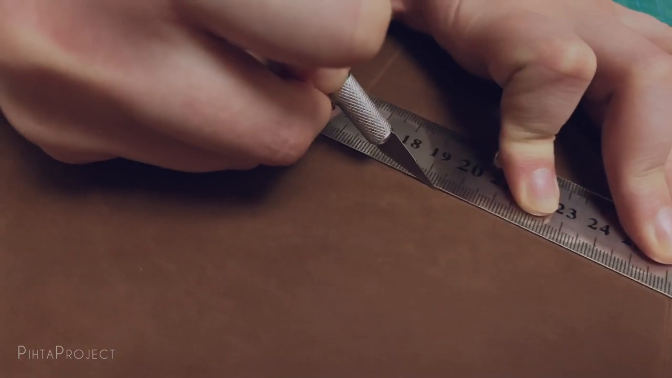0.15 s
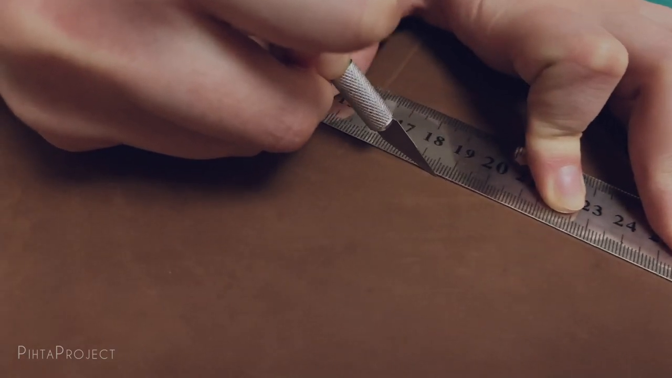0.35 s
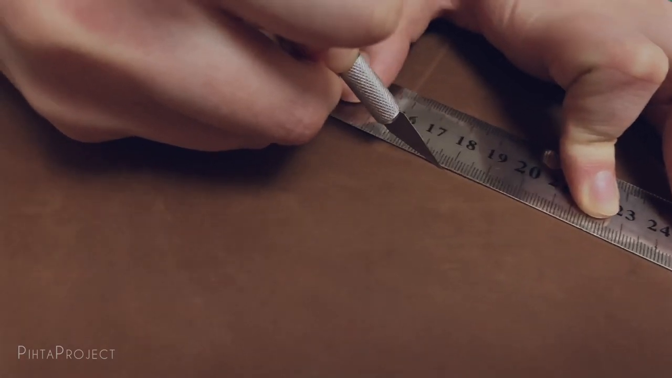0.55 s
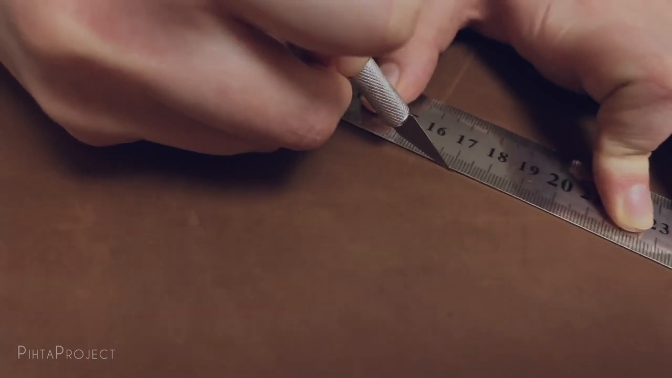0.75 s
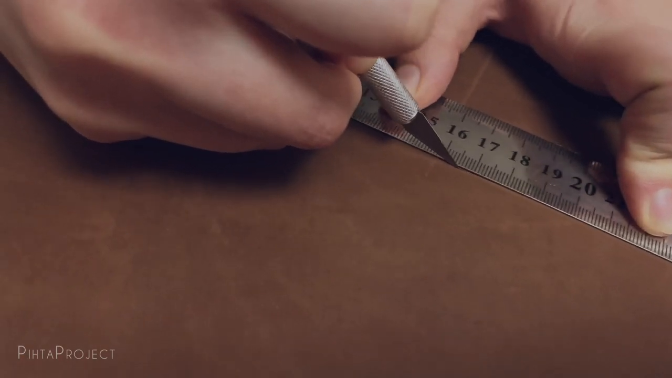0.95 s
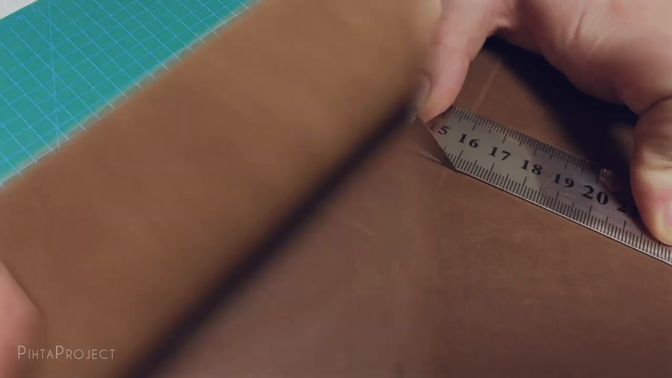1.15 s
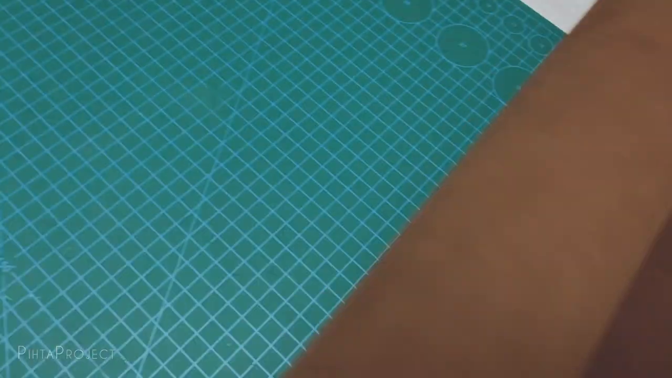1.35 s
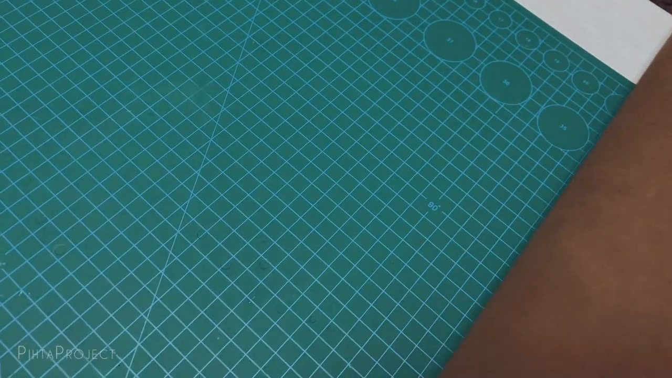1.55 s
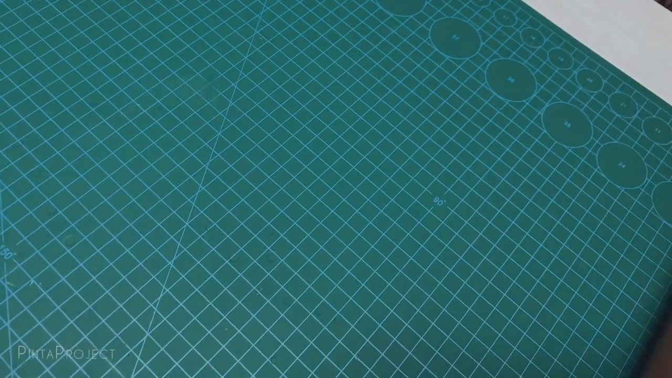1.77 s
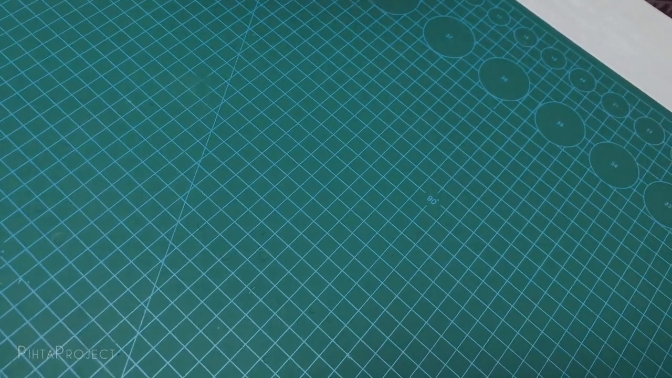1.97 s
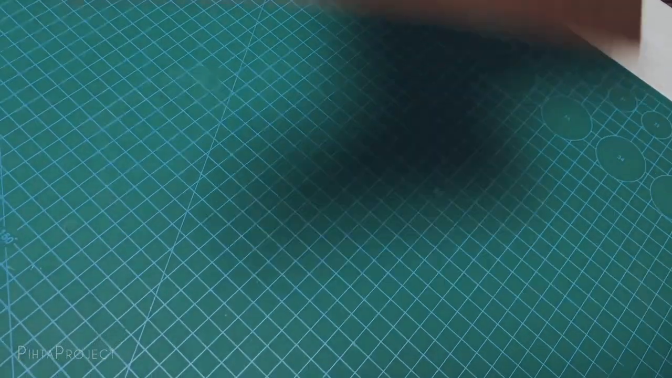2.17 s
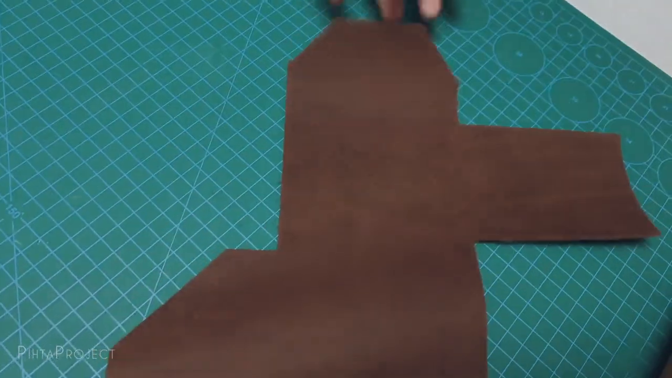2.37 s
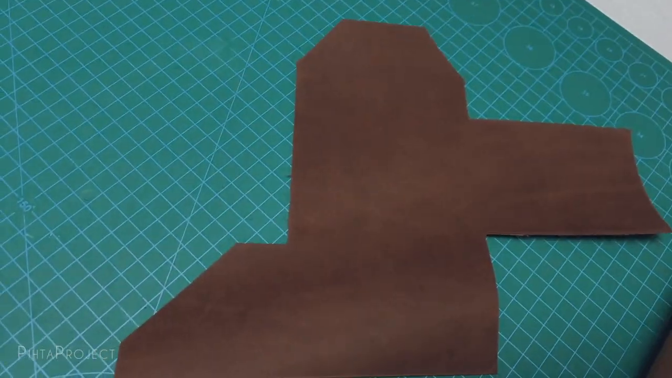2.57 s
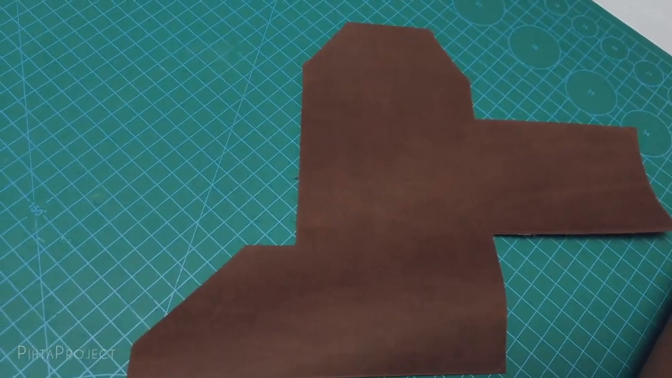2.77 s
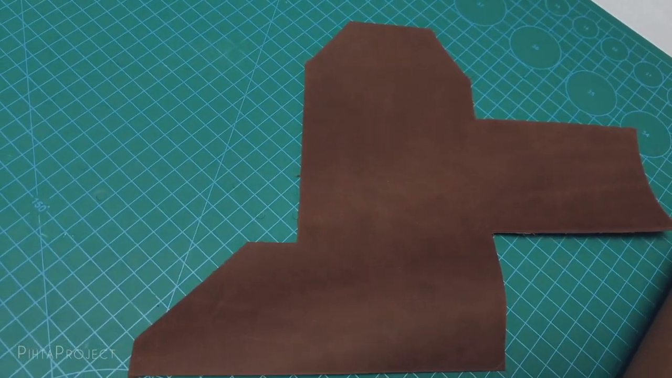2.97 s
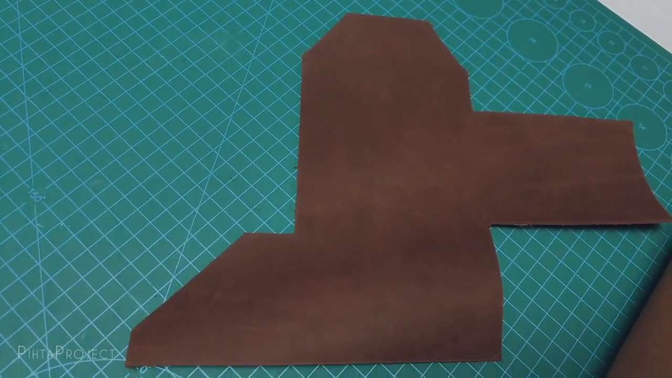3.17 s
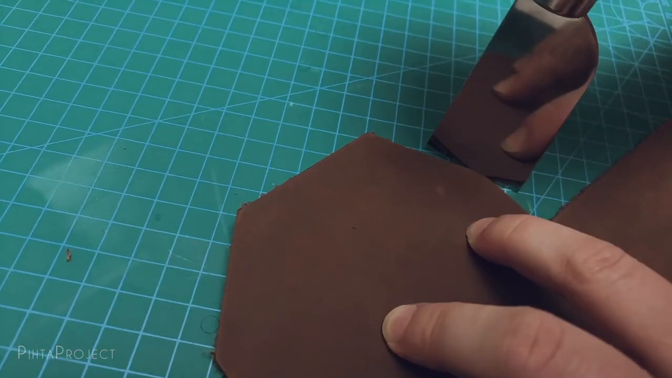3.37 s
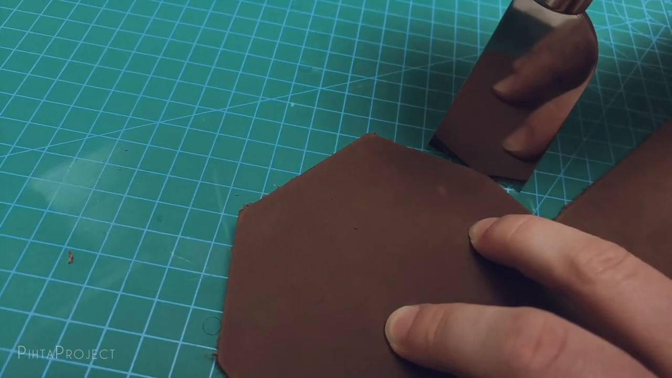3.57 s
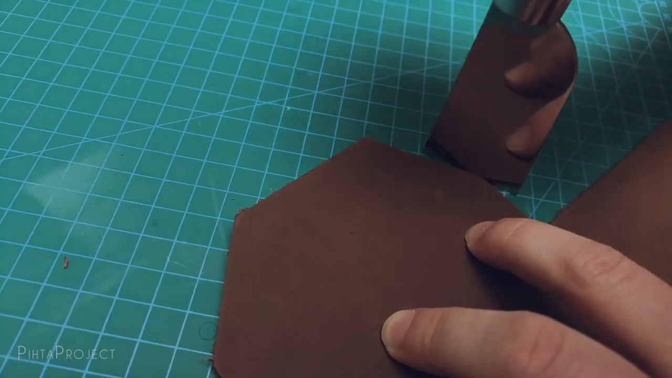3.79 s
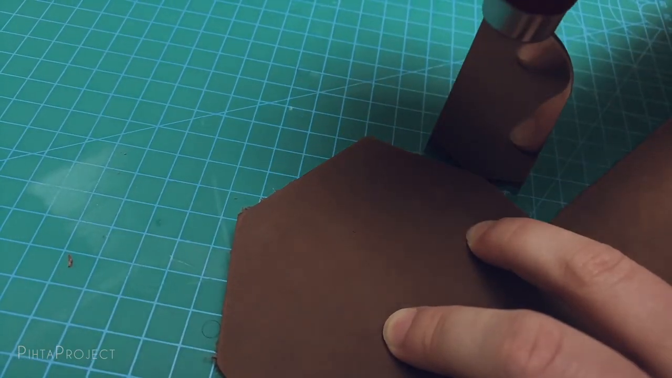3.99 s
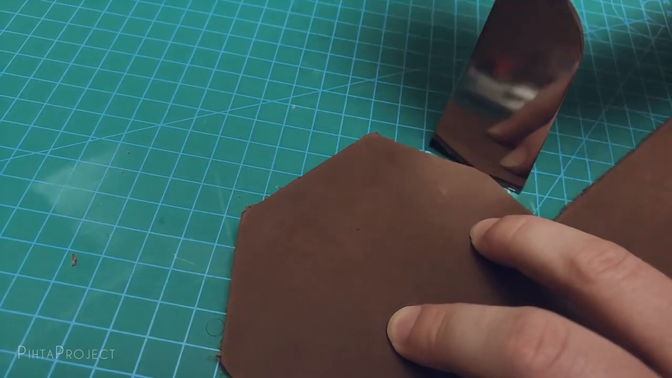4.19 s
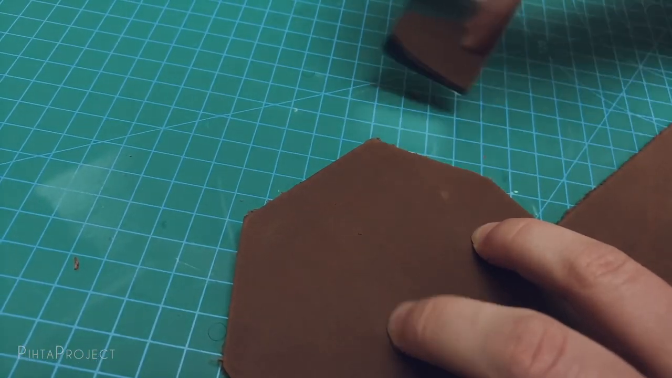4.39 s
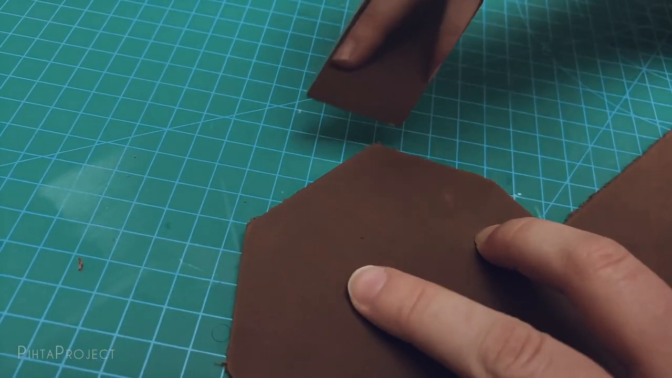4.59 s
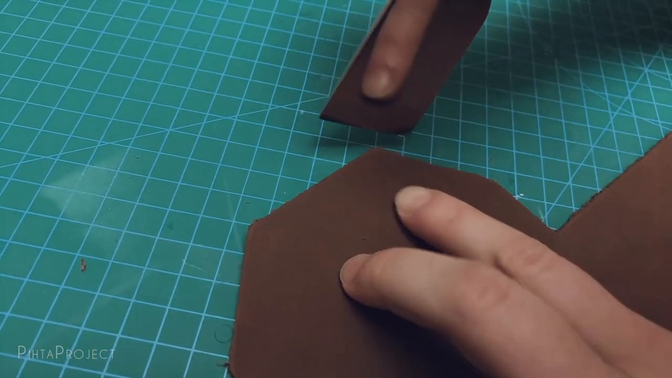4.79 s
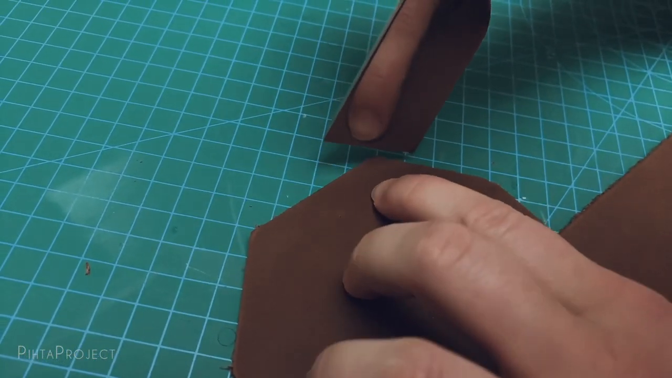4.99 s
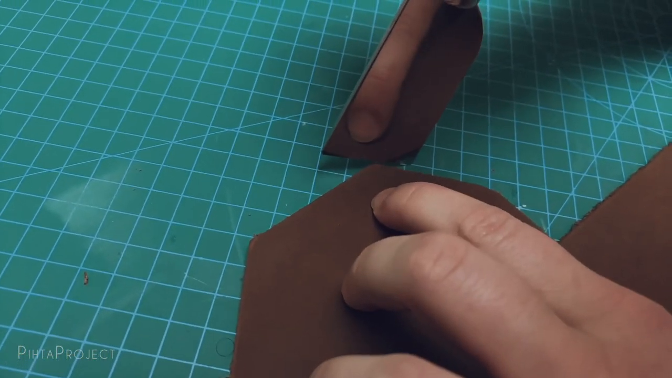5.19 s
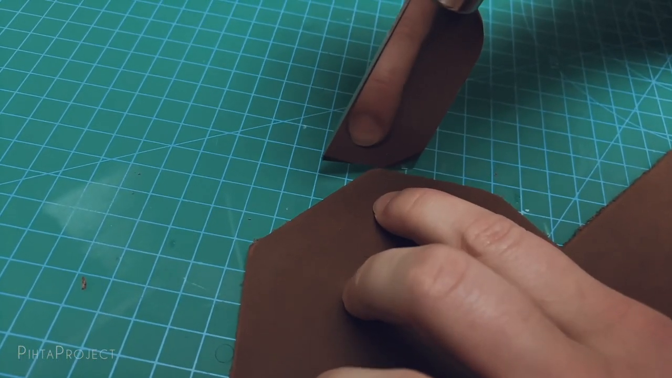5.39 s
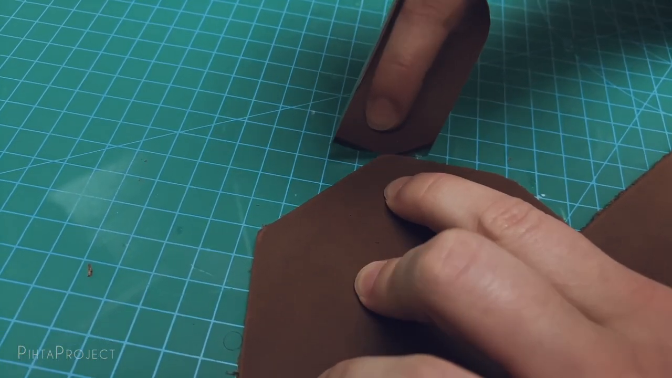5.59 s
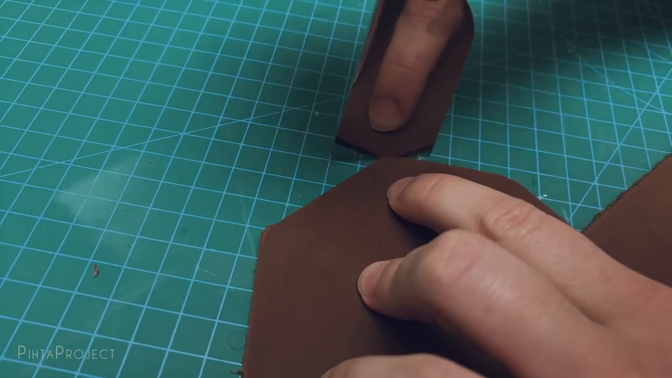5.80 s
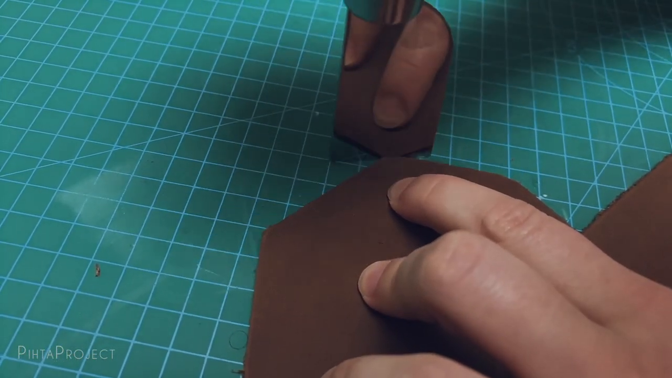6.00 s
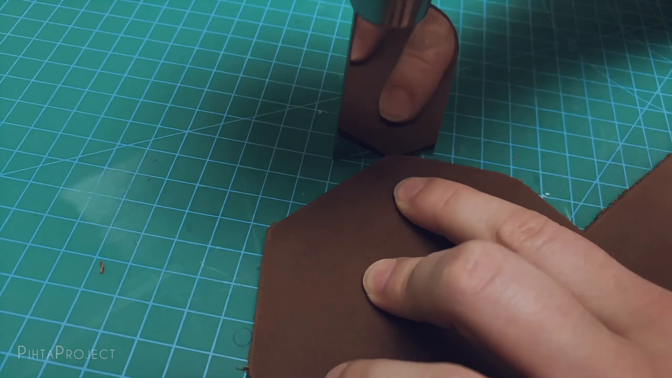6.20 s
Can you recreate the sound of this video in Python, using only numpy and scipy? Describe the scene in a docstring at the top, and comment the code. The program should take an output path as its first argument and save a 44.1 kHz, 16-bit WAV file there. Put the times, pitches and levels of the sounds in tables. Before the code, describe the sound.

Close leatherwork in a quiet small room: one long gritty knife cut, snappy leather slaps, a tiny squeak, then three short chopping crunches among soft slides.

```python
"""Leatherwork at a desk in a small room, close to the microphone, over steady room air.
A hobby knife rasps along a steel ruler: random fibre clicks through leather, ruler and desk spectra.
A hide is flipped over and a cut piece slapped onto the mat (pulses of air, snaps, rustle); the dragged hide
squeaks twice (noise on a rising tone). A broad knife chops off three corners (clicks through knife modes)
while fingers slide and turn the work (swept-speed grain). The level drops twice, briefly, before the chops."""
import sys
import numpy as np
from scipy import signal
from scipy.io import wavfile
from scipy.ndimage import uniform_filter1d

SR = 44100
rng = np.random.default_rng(int(sys.argv[2]) if len(sys.argv) > 2 else 0)


def wav_record(signal):
    """Record a signal, one row per channel, as 16-bit PCM in the file named by sys.argv[1]."""
    frames = np.transpose(np.atleast_2d(signal))
    bounded = np.clip(frames, -1, 1)
    # unit amplitude maps onto the largest positive 16-bit level
    quanta = np.round(bounded * 32767).astype(np.int16)
    wavfile.write(sys.argv[1], SR, quanta)


N = 275625
TIME = np.arange(N) / SR
HZ = np.fft.rfftfreq(4096, 1 / SR)


def amp(db):
    """Decibels to gain."""
    return 10 ** (np.asarray(db) / 20)


def unit(x):
    """Scales to rms 1."""
    return x / np.sqrt(np.mean(x ** 2) + 1e-20)


def read(points, hz=HZ):
    """Interpolates a table along a log-frequency axis."""
    f, value = np.transpose(points)
    return np.interp(np.log(hz + 1), np.log(f + 1), value)


def add(mix, start_s, sound):
    """Mixes a sound in, in place, cut off at the end of the mix."""
    part = mix[round(start_s * SR):][:len(sound)]
    part += sound[:len(part)]


def response(db):
    """Minimum-phase impulse response with the given spectral shape, scaled to energy 1."""
    log_gain = np.log(amp(np.r_[db, db[-2:0:-1]]))
    spectrum = np.exp(np.conj(signal.hilbert(log_gain)))
    taps = np.fft.ifft(spectrum).real
    return taps / np.linalg.norm(taps)


def colour(x, db):
    """Passes x through a body with the given spectral shape."""
    return signal.oaconvolve(x, response(db))[:len(x)]


def fibres(per_s, spread_db):
    """Fibres parting one by one: clicks of random time, sign and size, rms 1."""
    size = amp(spread_db * np.minimum(rng.exponential(1, N), 3))
    sign = rng.choice([-1, 1], N)
    parts_now = rng.random(N) < per_s / SR
    return unit(size * sign * parts_now)


def judder(rate_hz, depth_db):
    """Uneven sticking and slipping, as a gain of mean power 1."""
    knots = rng.standard_normal(N)
    return unit(amp(depth_db * np.interp(TIME * rate_hz, np.arange(N), knots)))


# room air spectrum: f/Hz, relative level/dB
AIR_SPECTRUM = [(20, -18.5), (36, -0.5), (48, -6), (61, 3.5), (80, -11), (105, -14.5), (135, -7.5),
                (170, -9), (215, -5.5), (280, -13), (340, -9.5), (700, -19), (1200, -21.5), (1700, -26),
                (10900, -40.5), (15500, -48)]
AIR_DB = -56


def hush():
    """Steady air of the room: shaped white noise."""
    return amp(AIR_DB) * colour(rng.standard_normal(N), read(AIR_SPECTRUM))


def steel_rule(x, t60_s, ring_db):
    """The thin ruler has many close modes: each snap rings on briefly with a fixed, jagged colour."""
    t = TIME[:SR // 20]
    ring = rng.standard_normal(len(t)) * amp(-60 * t / t60_s)
    return x + amp(ring_db) * signal.oaconvolve(x, ring / np.linalg.norm(ring))[:N]


# long cut: t/s, fibre rasp level/dB, ruler fizz level/dB, both before the gains below
STROKE = [(0.02, -48.5, -64.5), (0.294, -47, -67), (0.38, -44, -60), (0.5, -49, -61), (0.51, -52, -65),
          (0.634, -46, -57.5), (0.9, -52, -70.5), (0.926, -53, -70), (1.17, -52.5, -65.5)]
# toughest fibres catching the blade: t/s, click size/dB over the rms of the others
SNAGS = [(0.132, 31), (.171, 23), (.23, 23), (0.728, 30), (.756, 20), (.834, 23)]
# rasp spectrum, arm stretched out: f/Hz, relative level/dB
RASP_FAR = [(180, -24), (300, -18), (381, -4), (465, -9.5), (583, -0.5), (721, -10.5), (797, -6), (987, -7),
            (1120, -15), (1280, 0.5), (1590, -9), (2200, 0.5), (2530, -15), (2790, -11), (6000, -38),
            (7800, -44), (13200, -120)]
# rasp spectrum, knife drawn near: f/Hz, relative level/dB
RASP_NEAR = [(180, -15), (300, -15), (442, -2), (471, -11.5), (613, 3), (749, -9.5), (808, -4.5),
             (1120, -7.5), (1270, -5.5), (1670, -8), (1870, -2), (2070, -10), (2760, -5), (3130, -12),
             (6000, -41.5), (7800, -78), (13200, -120)]
# spectrum of the blade on the ruler: f/Hz, relative level/dB
FIZZ = [(2500, -25.5), (4000, 3.5), (4350, -11), (4770, 2), (5250, -2.5), (6600, -7.5), (7400, -12),
        (8600, -7), (9200, -7.5), (10000, -1.5), (10900, -20), (12800, -28), (15500, -17)]
# spectrum of the desk under the cut: f/Hz, relative level/dB
RUMBLE = [(30, -12.5), (80, 2), (135, 2.5), (190, -7), (260, -1.5), (450, -26), (900, -43.5)]
RASP_GAIN_DB, FIZZ_GAIN_DB, RUMBLE_GAIN_DB = 0, -1.5, -5.5


def long_cut():
    """The blade tears fibres in fits; the same snaps rasp in the leather and fizz on the ruler."""
    t, rasp_db, fizz_db = np.transpose(STROKE)
    drag = np.interp(TIME, [1.16, 1.2], [1, 0]) * judder(rate_hz=29.7, depth_db=0.7)
    rasp = amp(np.interp(TIME, t, rasp_db)) * drag
    fizz = amp(np.interp(TIME, t, fizz_db)) * drag

    snaps = fibres(per_s=3500, spread_db=2.0) * judder(rate_hz=300, depth_db=3.0)
    for at_s, size_db in SNAGS:
        add(snaps, at_s, amp([size_db]))

    near = np.interp(TIME, [.43, .59], [0, 1])
    leather = np.sqrt(1 - near) * colour(snaps, read(RASP_FAR))
    leather += np.sqrt(near) * colour(snaps, read(RASP_NEAR))
    ruler = colour(steel_rule(snaps, t60_s=0.015, ring_db=-5.0), read(FIZZ))
    # separate clicks, but in step with the rasp level
    desk = colour(fibres(per_s=3200, spread_db=-1.0), read(RUMBLE))
    cut = rasp * (amp(RASP_GAIN_DB) * leather + amp(RUMBLE_GAIN_DB) * desk)
    return cut + amp(FIZZ_GAIN_DB) * fizz * ruler


# colour of rubbed leather: f/Hz, relative level/dB
NAP = [(300, 4), (1700, 2.5), (2600, 1), (4500, -2), (9000, -0.5), (15500, -3)]


def rub(grain, start_s, length_s, hz, rise, q, power):
    """Leather grain brushing the mat: a band of clicks swelling and fading with the speed of the move."""
    part = grain[round(start_s * SR):round((start_s + length_s) * SR)]
    speed = np.interp(TIME[:len(part)] / length_s, [0, rise, 1], [0, 1, 0])
    band = 1 / (1 + (q * ((HZ + 1) / hz - hz / (HZ + 1))) ** 2)
    return speed ** power * colour(part, 20 * np.log10(band + 1e-4) + read(NAP))


# leather, blade and fingers sliding: start t/s, length/s, relative level/dB, centre f/Hz
SLIDES = [ (1.191, 0.086, -50, 6200), (1.192, .06, -41, 730), (1.249, 0.21, -49, 880),
          (1.378, 0.072, -44, 250), (1.61, 0.16, -47, 1490), (1.761, .17, -51, 1600),
          (2.14, 0.24, -63.5, 1510), (2.35, .12, -51, 990), (3.626, .04, -52, 1410),
          (3.752, 0.27, -57, 1510), (4.391, 0.069, -49.5, 2850), (4.44, 0.29, -61, 1880),
          (4.662, 0.043, -55.5, 1600), (4.68, 0.28, -55, 2250), (4.789, 0.099, -56, 3700),
          (4.922, 0.21, -60.5, 1392), (5.865, .25, -53, 1400), (5.928, 0.33, -55, 330),
          (6.2, 0.085, -57, 2750)]
SLIDE_RISE = 0.3  # share of the slide spent speeding up
SLIDE_Q, SLIDE_Q_HZ = 0.39, 3800  # broad band, sharper the higher it lies


def slides():
    """The work is pushed and turned on the mat: each move speeds up quickly and runs out slowly."""
    grain = fibres(per_s=7000, spread_db=3.5) * judder(rate_hz=130, depth_db=2.5)
    out = np.zeros(N)
    for start_s, length_s, db, hz in SLIDES:
        q = np.hypot(SLIDE_Q, hz / SLIDE_Q_HZ)
        add(out, start_s, amp(db) * rub(grain, start_s, length_s, hz, SLIDE_RISE, q, power=0.63))
    return out


# desk modes under the mat: f/Hz, relative level/dB, t60/s
DESK = [(41.3, -33, 0.5), (62.5, -16, 0.096), (131, -5, 0.2), (174, -3.5, 0.075), (214, -4, 0.041),
        (253, 0.5, 0.11), (320.6, 2, 0.14), (469.5, 0.5, 0.19), (592, -9, 0.17)]
SETTLE, GLIDE_SWELLS = 0.497, 1.22  # usual final share of the first pitch; time constant of the glide


def thump(first_hz, swell_s, settle, desk_db):
    """Air squeezed out in a pulse whose pitch sinks as the contact spreads, and the desk shaking under it."""
    t = TIME[:SR // 2]
    u = t / swell_s
    hz = first_hz * (settle + (1 - settle) * np.exp(-u / GLIDE_SWELLS))
    air = (u * np.exp(1 - u)) ** 1.6 * np.sin(2 * np.pi * np.cumsum(hz) / SR)
    desk = sum(amp(db - 60 * t / t60_s) * np.sin(2 * np.pi * f * t) for f, db, t60_s in DESK)
    return air + amp(desk_db) * desk / abs(desk).max()


# leather, knife or fingers meeting the mat: t/s, air pulse level/dB, first f/Hz, snap peak level/dB
CONTACTS = [ (1.192, -29, 483, -70), (1.2075, -16.5, 532, -33), (1.222, -18.5, 423, -60),
            (1.284, -22, 2550, -19.5), (1.287, -29.5, 836, -34), (1.385, -35, 330, -65),
            (1.391, -36.5, 1900, -52), (1.6037, -20.5, 2040, -20), (1.6067, -19.5, 710, -40),
            (1.6105, -17, 940, -18.5), (1.6195, -19, 1600, -15.5), (1.6209, -18.5, 362, -32),
            (2.3208, -40, 1400, -45), (2.3494, -26.5, 2100, -46), (2.354, -22.5, 3160, -22),
            (2.359, -10, 2510, -28), (2.364, -19.5, 1450, -21.5), (2.3689, -23, 1930, -34),
            (3.6282, -34.5, 517, -55), (3.642, -37, 610, -50), (3.698, -39, 1730, -29),
            (4.795, -44, 3820, -30.5), (4.806, -48, 150, -58), (5.1099, -41, 1410, -53),
            (5.1115, -30, 380, -65), (5.116, -39.5, 100, -77)]
# snap spectrum: f/Hz, relative level/dB
SNAP = [(300, -28), (1500, 8), (3000, 12.5), (5000, 5), (6500, -8), (9000, -18), (15500, -30)]
SWELL_CYCLES = 2  # cycles of the first pitch until the air pulse peaks
DESK_DB, DESK_DB_PER_OCTAVE = -8.5, -0.6  # desk re air pulse at 1 kHz; small, high patches shake it less
RUSTLE_DB, RUSTLE_S, RUSTLE_RATIO = -18.5, 0.037, 0.65  # re air pulse; length; centre re first pitch


def blows():
    """Each contact snaps, thumps and rustles to rest; a wide patch is lower and slower than a small one."""
    snap = response(read(SNAP))
    snap = snap / abs(snap).max()
    grain = fibres(per_s=7000, spread_db=0.5)
    out = np.zeros(N)
    for at_s, db, hz, snap_db in CONTACTS:
        add(out, at_s, amp(snap_db) * snap)
        desk_db = DESK_DB + DESK_DB_PER_OCTAVE * np.log2(hz / 1000)
        add(out, at_s, amp(db) * thump(hz, SWELL_CYCLES / hz, SETTLE, desk_db))
        rustle = rub(grain, at_s, RUSTLE_S, RUSTLE_RATIO * hz, rise=0.012, q=1.0, power=2.1)
        add(out, at_s, amp(db + RUSTLE_DB) * rustle)
    return out


# hide squeaking as it is dragged into place: start t/s, peak t/s, end t/s, level/dB, first f/Hz, last f/Hz
SQUEAKS = [(1.799, 1.818, 1.84, -47.5, 1900, 3530), (1.844, 1.858, 1.883, -50, 2400, 3380)]


def squeaks(width_hz):
    """Rough stick-slip whose rate rises as the hide gathers speed: low-passed noise on a rising tone."""
    low_pass = signal.butter(3, width_hz, fs=SR, output="sos")
    rough = signal.sosfilt(low_pass, rng.standard_normal(N))
    out = np.zeros(N)
    for start_s, peak_s, end_s, db, first_hz, last_hz in SQUEAKS:
        turns = np.cumsum(np.interp(TIME, [start_s, end_s], [first_hz, last_hz])) / SR
        swell = np.interp(TIME, [start_s, peak_s, end_s], [0, 1, 0])
        out += amp(db) * swell * unit(rough * np.sin(2 * np.pi * turns))
    return out


CRACK_LOW_HZ, CRACK_HIGH_HZ, CRACK_SWELL_S = 1461, 2473, 0.00086


def cracks(full_s, through_s, count):
    """Tough fibre bundles give way one after another, unevenly, from full force to breakthrough."""
    out = np.zeros(SR)
    for k, (when, pitch) in enumerate(rng.random((count, 2))):
        at_s = (through_s - full_s) * (k + when) / count
        hz = CRACK_LOW_HZ + (CRACK_HIGH_HZ - CRACK_LOW_HZ) * pitch
        add(out, at_s, thump(hz, CRACK_SWELL_S, SETTLE, desk_db=-16))
    return out


# corners chopped off: start t/s, full force t/s, through t/s, crunch level/dB,
# force at start/dB and at end/dB (re full), blade ring, crack and thud level/dB, thud first f/Hz, grip
CHOPS = [(3.675, 3.734, 3.765, -30.5, -18, -5, -64, -40, -32, 350, "flat"),
         (4.211, 4.231, 4.269, -30.5, -12.5, -2, -38, -40, -23.5, 696, "tilted"),
         (5.823, 5.846, 5.907, -31.5, -17, -5, -70, -26, -41, 480, "flat")]
# crunch spectrum: f/Hz, relative level/dB
CRUNCH = [(50, -9), (170, -9), (400, -1), (900, -4), (1700, -4), (2400, -14), (3300, -14), (4500, -22.5),
          (7000, -27.5), (10000, -36), (15500, -37)]
# broad knife on the mat, by grip: f/Hz, width/Hz, boost/dB
KNIFE = { "flat": [(502, 160, 7), (635, 81, -9.5), (778, 91, 9), (890, 76, -11), (1356, 87, 5),
         (1670, 370, 1.5), (2460, 190, 1.5), (2920, 390, 6.5), (3600, 130, -3), (7800, 370, 6),
         (12800, 410, -3)], "tilted": [(140.3, 160, -10), (380, 320, -6.5), (605, 160, 2), (804, 28, 11),
         (950, 150, -13.5), (1210, 190, -12), (1870, 200, 4.5), (2150, 170, -11), (3200, 120, 6),
         (3900, 160, 7), (4480, 580, 6)]}
# ring of its steel blade: f/Hz, width/Hz, relative level/dB
BLADE = [(3300, 300, -7), (5100, 400, -12), (6350, 200, -12), (7030, 200, -13), (8750, 130, -8),
         (9150, 300, -6), (9425, 55, 0), (10150, 350, -8), (13550, 400, -12), (14110, 80, -5)]
THUD_LEAD_S = 0.012  # the edge meets the mat just before the corner comes free
THUD_SWELL_S, THUD_SETTLE, THUD_DESK_DB = 0.005, 0.762, -5


def chops():
    """Force builds until the edge breaks through and thuds; the crunch sounds in knife and ringing blade."""
    snaps = fibres(per_s=6000, spread_db=1.0) * judder(rate_hz=450, depth_db=2.0)
    low_pass = signal.butter(2, 750, fs=SR, output="sos")
    crunch, scrape = np.zeros((2, N))
    for (start_s, full_s, through_s, db, start_db, end_db,
         ring_db, crack_db, thud_db, thud_hz, grip) in CHOPS:
        stages = [start_s, full_s, through_s]
        force = amp(np.interp(TIME, stages, [start_db, 0, end_db]))
        force *= np.interp(TIME, [start_s - .002, start_s, through_s, through_s + .004], [0, 1, 1, 0])

        body_db = read(CRUNCH)
        for hz, width_hz, peak_db in KNIFE[grip]:
            body_db = body_db + peak_db / (1 + (2 * (HZ - hz) / width_hz) ** 2)
        sound = amp(db) * colour(force * snaps, body_db)
        # the bass grows as the edge sinks towards the mat
        bass = signal.sosfiltfilt(low_pass, sound)
        bass_gain = amp(np.interp(TIME, stages, [-9, 0, 1.5]))
        crunch += sound + bass * (bass_gain - 1)

        thud = thump(thud_hz, THUD_SWELL_S, THUD_SETTLE, THUD_DESK_DB)
        add(crunch, through_s - THUD_LEAD_S, amp(thud_db) * thud)
        add(crunch, full_s, amp(crack_db) * cracks(full_s, through_s, count=4))
        scrape += amp(ring_db) * force * snaps

    t = TIME[:SR // 8]
    steel = np.zeros(len(t))
    for hz, width_hz, db in BLADE:
        decay = np.sqrt(width_hz) * np.exp(-np.pi * width_hz * t)
        steel += amp(db) * decay * np.sin(2 * np.pi * hz * t)
    return crunch + signal.oaconvolve(scrape, steel / np.linalg.norm(steel))[:N]


# reverberation: f/Hz, t60/s
ROOM_T60 = [(100, 0.49), (300, 0.4), (1000, 0.33), (2500, 0.33), (6000, 0.22), (14000, 0.16)]
# spectrum of the reflections at their start: f/Hz, relative level/dB
ROOM_COLOUR = [(60, 11), (400, 0.5), (2200, -5), (5000, -4), (14000, 0)]


def room(x, delay_s, rise_s):
    """Sparse reflections of random sign, each band dying at its own speed."""
    t = TIME[:SR // 2]
    taps = rng.choice([-1., 1.], len(t)) * (rng.random(len(t)) < 4000 / SR)
    onset = np.clip((t - delay_s) / rise_s, 0, 1)
    hz, at_s, bands = signal.stft(taps * onset, SR, nperseg=256)
    decay_db = read(ROOM_COLOUR, hz)[:, None] - 60 * at_s / read(ROOM_T60, hz)[:, None]
    tail = signal.istft(bands * amp(decay_db), SR, nperseg=256)[1]
    return signal.oaconvolve(x, tail / np.linalg.norm(tail))[:N]


def scene():
    """All the handwork, its reflections and the quiet room."""
    air = hush()
    handwork = long_cut() + slides() + squeaks(width_hz=680) + chops()
    slaps = blows()
    wet = room(amp(-15.5) * slaps + amp(-15.0) * handwork, delay_s=0.0054, rise_s=0.007)
    return (slaps + handwork + wet + air)[None]


# brief drops in level: start t/s, end t/s
DROPS = [(1.32, 1.354), (3.335, 3.369)]
DROP_DB, CLICK_DB, CLICK_DECAY_S = -24.0, -28.5, 0.0012
LOW_CUT_HZ, HIGH_CUT_HZ = 22, 15850


def record(dry):
    """The microphone loses the deepest bass; the level drops twice, the first ending in a click; treble cut."""
    gate = np.ones(N)
    for start_s, end_s in DROPS:
        gate[round(start_s * SR):round(end_s * SR)] = amp(DROP_DB)
    low_cut = signal.butter(2, LOW_CUT_HZ, "high", fs=SR, output="sos")
    out = signal.sosfilt(low_cut, dry[0]) * uniform_filter1d(gate, size=32)
    click = -amp(CLICK_DB) * np.exp(-TIME[:SR // 20] / CLICK_DECAY_S)
    add(out, DROPS[0][1], click)
    high_cut = signal.firwin(511, HIGH_CUT_HZ, window=("kaiser", 9), fs=SR)
    return signal.oaconvolve(out, high_cut, "same")[None]


dry = scene()
out = record(dry)
wav_record(out)
```